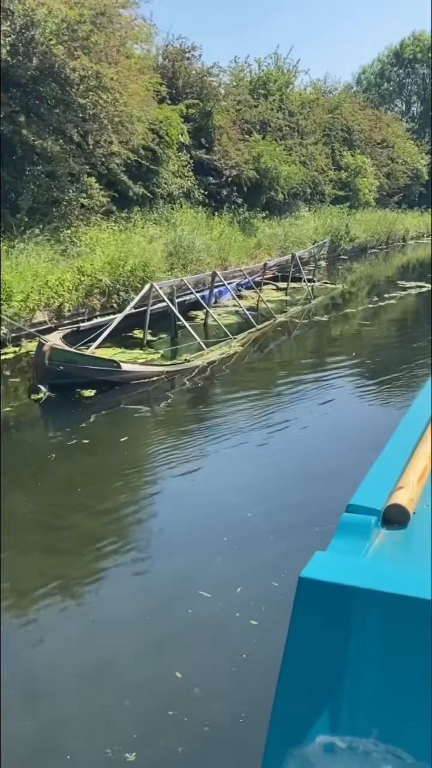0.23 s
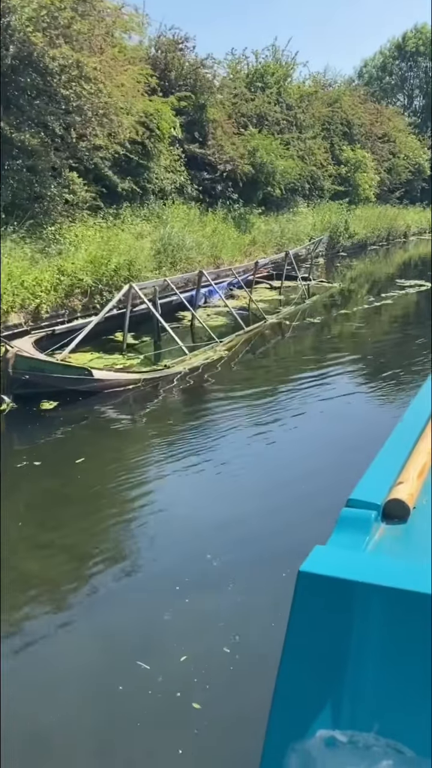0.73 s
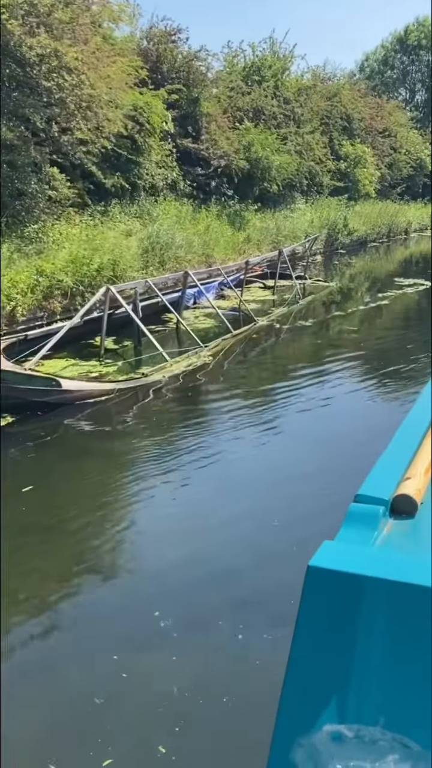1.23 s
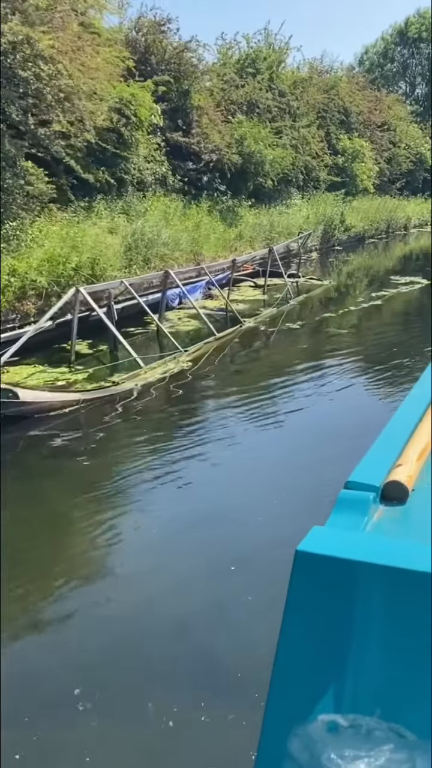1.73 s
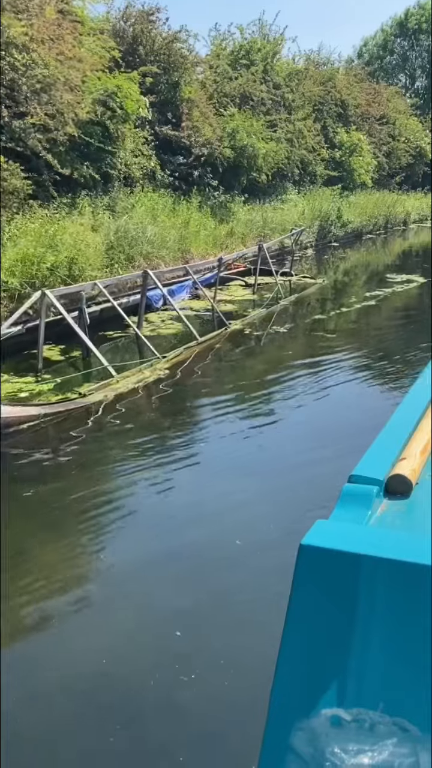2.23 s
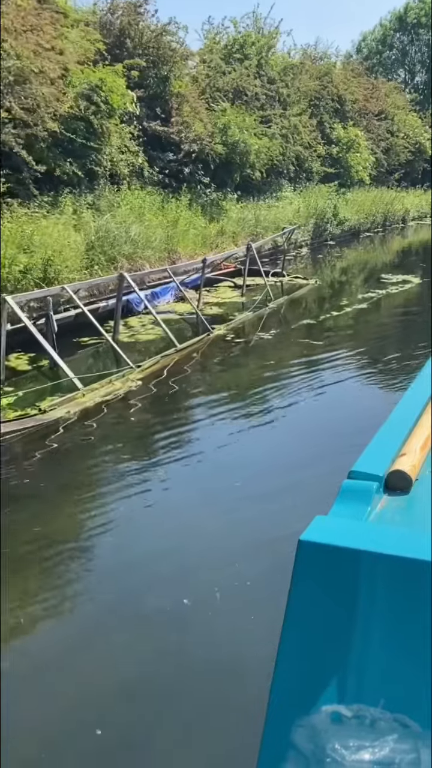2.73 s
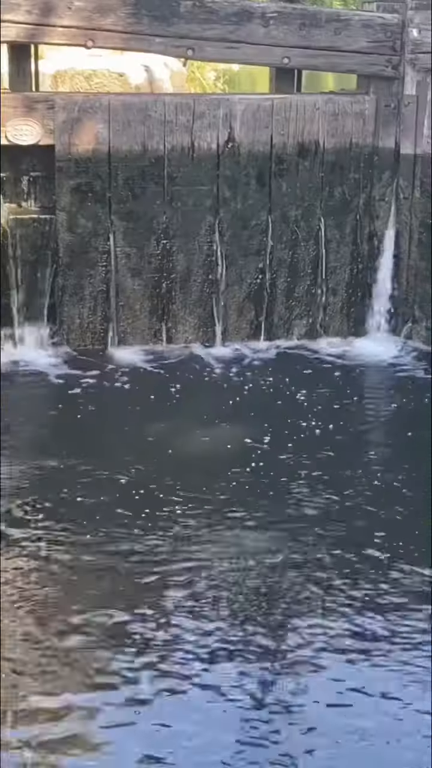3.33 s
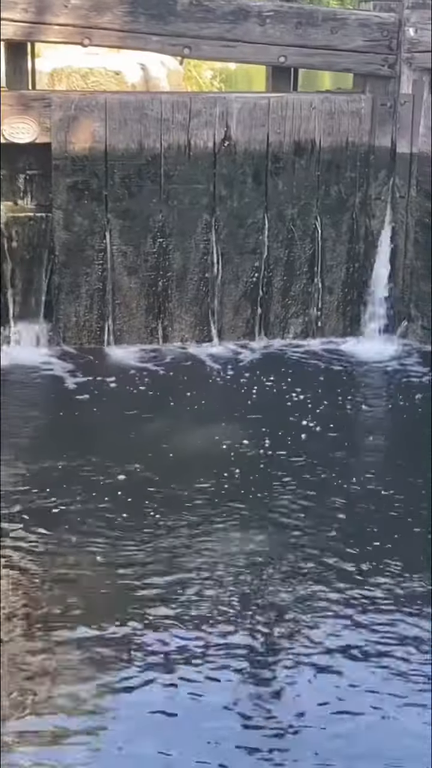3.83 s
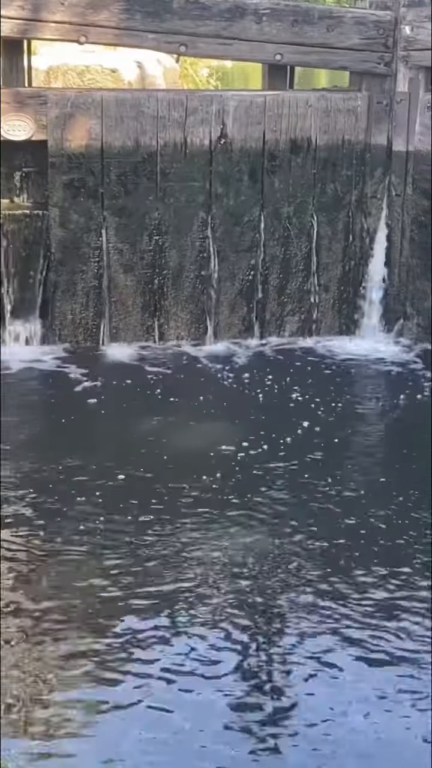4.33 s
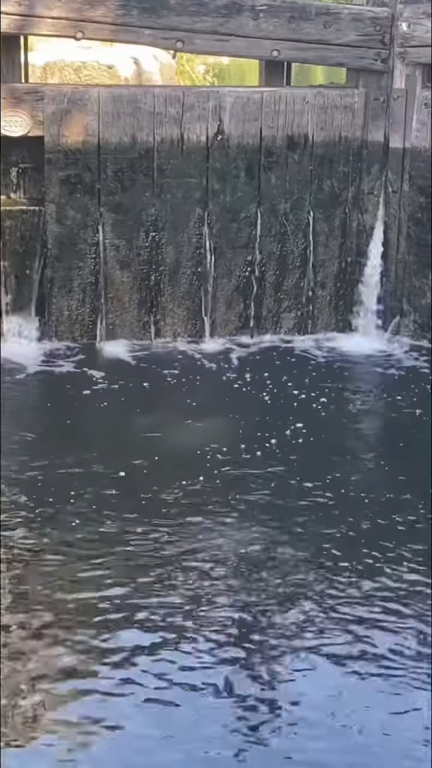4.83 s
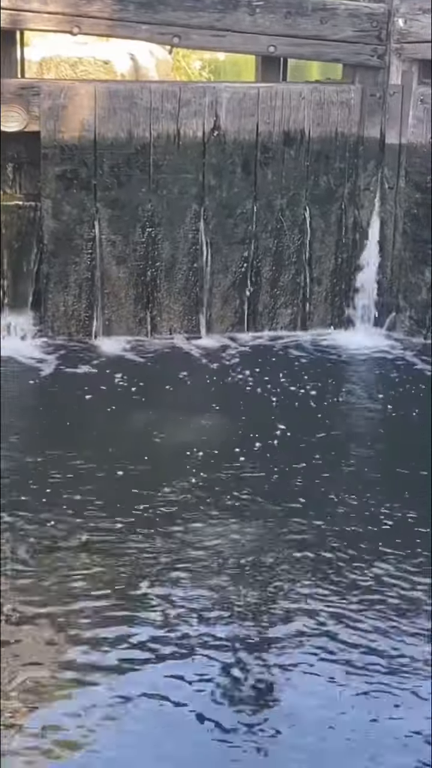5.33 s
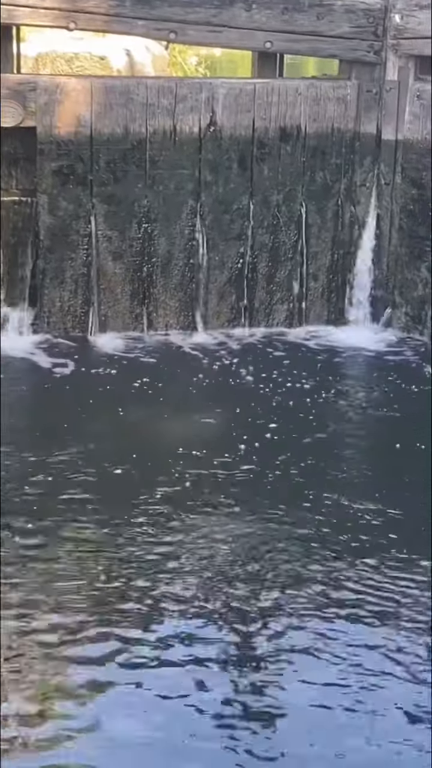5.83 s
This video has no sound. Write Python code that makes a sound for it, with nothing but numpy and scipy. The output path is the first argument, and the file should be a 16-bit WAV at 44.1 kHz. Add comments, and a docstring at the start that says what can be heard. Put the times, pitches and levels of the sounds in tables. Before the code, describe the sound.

Quiet canal glide with low water rumble, soft hull slops and a whistling hedge bird, then abruptly loud water pouring through lock gates over an idling engine.

```python
"""Water rumbles, slops and splashes on a boat gliding along a canal: shaped turbulence and ringing hull modes.
A small bird in the hedge repeats three down-slurred syllables, whistles on pitch curves; others twitter far off.
Then, abruptly, a lock: jets leak through the wooden gates and plunge into the pool as noise, drop ticks and
decaying bubble tones, while the boat's engine idles as a sum of orders of its firing rate.
Two closely spaced microphone ports hear it all, with partial coherence and phase differences."""
import sys
import numpy as np
from scipy import signal
from scipy.fft import rfft, irfft, next_fast_len
from scipy.io import wavfile
from scipy.ndimage import uniform_filter1d

SR = 44100
rng = np.random.default_rng(int(sys.argv[2]) if len(sys.argv) > 2 else 0)


def master_out(mix):
    """Clip the mix to full scale and print it as 16-bit PCM to the path in sys.argv[1]."""
    frames = np.transpose(np.atleast_2d(mix))
    ceiling = np.clip(frames, -1, 1)
    pcm = np.round(ceiling * 32767).astype(np.int16)
    wavfile.write(sys.argv[1], SR, pcm)


N = 267731

CHANGE_S = 2.999   # the canal ends and the lock begins
TIME = np.arange(N) / SR
SIZE = next_fast_len(N, real=True)
BINS = np.maximum(np.arange(SIZE // 2 + 1) * SR / SIZE, 1)   # Hz

# spectrum of the spray and patter of the jets: columns f/Hz, relative density/dB
SPRAY_SPECTRUM = [(1200, -40), (2800, 2.5), (4000, -2), (6300, 1), (10000, -6), (16000, -18)]


def from_db(db):
    """Logarithmic levels: decibels become an amplitude ratio."""
    return 10 ** (np.asarray(db) / 20)


def rms_one(x):
    """Mean-square normalisation: scale to unit rms."""
    return x / np.sqrt(np.mean(x ** 2) + 1e-20)


def at_hz(rows, hz):
    """Log-frequency interpolation: read each column of a table at the given frequencies."""
    points, *columns = np.transpose(rows)
    return [np.interp(np.log(hz), np.log(points), column) for column in columns]


def drift(rate):
    """Low-passed noise: a slow random fluctuation of unit rms with two poles at rate Hz."""
    step = 40   # samples between slow values
    pole = np.exp(-2 * np.pi * rate * step / SR)
    white = rng.standard_normal(N // step + 2002)
    slow = signal.lfilter([1], [1, -2 * pole, pole * pole], white)[2000:]   # skip the settling
    return np.interp(np.arange(N) / step, np.arange(len(slow)), rms_one(slow))


def add(track, s, sound):
    """Superposition: mix a short sound in at time s."""
    start = int(np.clip(s * SR, 0, N - 1))
    track[start:start + len(sound)] += sound[:N - start]


def colour(x, gain_db):
    """Linear filtering: weight the spectrum by a gain per frequency bin."""
    return irfft(rfft(x, SIZE) * from_db(gain_db), SIZE)[:N]


def noise(spectrum):
    """Stationary random noise: Gaussian samples of a given spectrum, at unit rms."""
    return rms_one(colour(rng.standard_normal(SIZE), at_hz(spectrum, BINS)[0]))


def turbulence(spectrum, patchy_db, rate):
    """Intermittency of turbulence: each half octave swells and sinks on its own, at unit rms in all."""
    coloured = rfft(noise(spectrum), SIZE)
    half_octave = np.floor(2 * np.log2(np.clip(BINS, 45, spectrum[-1][0])))
    total = np.zeros(N)
    for k in np.unique(half_octave):
        band = irfft(coloured * (half_octave == k), SIZE)[:N]
        total += band * from_db(patchy_db * drift(rate))
    return rms_one(total)


def scatter(x, t60):
    """Multiple scattering: many weak random reflections decay, with unit total energy."""
    t = TIME[:int(t60 * SR)]
    echoes = rng.standard_normal(len(t)) * from_db(-60 * t / t60)
    return signal.fftconvolve(x, echoes / np.linalg.norm(echoes))[:N]


def at_ports(direct, diffuse, ports):
    """Partial coherence: direct sound is common but out of phase, diffuse sound opposes at the two ports."""
    likeness, lead, balance_db = at_hz(ports, BINS)
    likeness = np.clip(likeness, 0, 1)
    sides = np.array([[1], [-1]])   # left, right
    common = np.sqrt((1 + likeness) / 2) * rfft(direct, SIZE)
    opposed = sides * np.sqrt((1 - likeness) / 2) * rfft(diffuse, SIZE)
    gain = from_db(sides * balance_db / 2)
    phase = np.exp(.5j * sides * lead)
    return irfft((common + opposed) * gain * phase, SIZE)[:, :N]


def waves():
    """Amplitude envelopes: each wave running along the hull swells, holds and ebbs."""
    # passing waves: columns start t/s, length/s, level/dB
    passing = [(0.0, 0.077, -43), (0.32, 0.26, -46), (0.884, 0.1, -46.5), (0.997, 0.24, -41),
               (1.3, 0.16, -46), (1.71, 0.12, -46)]
    attack_s, release_s = 0.027, 0.046
    swell = np.zeros(N)
    for s, length, db in passing:
        rise = np.clip((TIME - s) / attack_s, 0, 1)
        ebb = np.clip((s + length - TIME) / release_s + .5, 0, 1)
        swell += from_db(db) * rise * ebb
    return swell


def wash():
    """Flow noise: each wave lifts first the gurgle along the hull, then the rumble as it rolls under the boat."""
    # deep rumble under the boat: columns f/Hz, relative density/dB
    rumble_spectrum = [(15, -65), (30, -25), (50, -6), (68, -1.5), (92, -16), (130, -16), (300, -52),
                       (900, -74)]
    # gurgle along the side: columns f/Hz, relative density/dB
    wash_spectrum = [(50, -26), (110, -9), (145, -1), (200, 5), (240, -9.5), (285, -7), (380, -22),
                     (900, -57), (2500, -88)]
    rumble_db, rumble_db_per_s, wash_db = -51, 2, -50   # the rumble grows slowly, the wash is steady
    roll_lag_s, roll_db, roll_ref_db = 0.032, -41.5, -40
    roll_growth = 3.8   # exponent: bigger waves rumble disproportionately more
    swell = waves()
    late_swell = np.interp(TIME - roll_lag_s, TIME, swell)
    roll = from_db(roll_db) * (late_swell / from_db(roll_ref_db)) ** roll_growth
    rumble_level = np.hypot(from_db(rumble_db + rumble_db_per_s * TIME), roll)
    wash_level = np.hypot(from_db(wash_db), swell)
    rumble = rumble_level * turbulence(rumble_spectrum, patchy_db=-1.5, rate=16)
    return rumble + wash_level * turbulence(wash_spectrum, patchy_db=4.0, rate=8.8)


def canal_air():
    """Broadband ambient noise: the rush of the open air keeps a steady mean level."""
    # open air: columns f/Hz, relative density/dB
    air_spectrum = [(15, -25), (45, 5), (120, 0.5), (350, -2), (480, -3), (700, -1.5), (1000, -2),
                    (1400, -10.5), (2000, -21), (2600, -27), (3500, -30), (5200, -37.5), (6500, -44),
                    (8000, -56), (12000, -56), (16000, -71)]
    return from_db(-44.5) * turbulence(air_spectrum, patchy_db=0.85, rate=10.0)


def leaves(rustle_db=-74):
    """Fluctuating band noise: reeds and hedge rustle faintly, swelling here and there."""
    # reeds and leaves: columns f/Hz, relative density/dB
    rustle_spectrum = [(1200, -31), (2700, 5), (4500, 2.5), (6300, 0.5), (8000, -27.5), (13000, -23)]
    return from_db(rustle_db) * turbulence(rustle_spectrum, patchy_db=6.0, rate=7)


def hull(push_s=0.0055, upper_hz=100):
    """Modal excitation: wavelets push softly on the hull and set its low damped modes ringing."""
    # water slopping on the hull: columns t/s, level/dB, extra level of the upper modes/dB
    slops = [(0.017, -40, -5), (1.317, -33.5, -2), (1.77, -39.5, -6), (2.157, -38, -9), (2.213, -37.5, -6),
             (2.404, -42, -9), (2.635, -35, -11), (2.765, -36, -21)]
    # hull modes: columns mean f/Hz, relative level/dB, t60/s
    modes = [(60, 5.5, 0.14), (71, 0.5, 0.28), (140, 6.5, 0.21), (171, 4, 0.18), (214, -1, 0.19)]
    out, t = np.zeros(N), TIME[:SR // 2]
    for s, slop_db, upper_db in slops:
        for hz, mode_db, t60 in modes:
            swell = (1 - np.exp(-t / push_s)) ** 2 * from_db(-60 * t / t60)
            detuned_hz = hz * (1 + rng.normal(0, 0.087))
            ring = np.sin(2 * np.pi * detuned_hz * t)
            level_db = slop_db + mode_db + upper_db * (hz > upper_hz)
            add(out, s, from_db(level_db) * swell * ring)
    return out


def bird(notes, swoop_s, arch, fade_db):
    """Frequency modulation: each note glides to a held pitch, arches a little and flicks away at its end."""
    out = np.zeros(N)
    for s, start_hz, held_hz, end_hz, length, level_db in notes:
        t = TIME[:int(length * SR)]
        age = t / length
        swoop = (start_hz - held_hz) * np.exp(-(t / swoop_s) ** 1.4)
        flick = (end_hz - held_hz) * age ** 6
        hz = held_hz * (1 + arch * age ** 3 * (1 - age)) + swoop + flick
        edges = np.minimum(1, np.minimum(t, length - t) / .008)
        tone = np.sin(2 * np.pi * np.cumsum(hz) / SR)
        add(out, s, edges * from_db(level_db - fade_db * age) * tone)
    return out


def chorus(count=170, low_hz=2400, high_hz=5400, level_db=-75.5, bend=.25):
    """Random superposition: many far birds twitter in the trees, at pitches even on a log scale."""
    when, pitch, start, end, length = rng.random((count, 5)).T
    hz = low_hz * (high_hz / low_hz) ** pitch
    start_hz = hz * (1 + bend * (start - .5))
    end_hz = hz * (1 + bend * (end - .5))
    notes = [when * CHANGE_S, start_hz, hz, end_hz, .03 + .04 * length, np.full(count, level_db)]
    return bird(np.transpose(notes), swoop_s=.02, arch=.2, fade_db=3)


def far_birds():
    """Direct and scattered fields: hoarse song reaches both ports in step; of the chorus only the blur arrives."""
    # song further off: columns t/s, starting f/Hz, held f/Hz, ending f/Hz, length/s, relative level/dB
    warble = [(.615, 2490, 2580, 2900, 0.063, -64), (.645, 2150, 2270, 2450, 0.074, -65),
              (.675, 2750, 2900, 3100, .05, -67), (.825, 2670, 2650, 3120, 0.055, -63.5),
              (1.04, 2870, 2760, 2980, 0.049, -64.5), (1.205, 5000, 4450, 4200, 0.027, -72),
              (1.25, 2950, 2910, 3400, 0.076, -71), (1.3, 3200, 3600, 4200, 0.046, -70),
              (1.49, 2850, 3080, 3380, 0.06, -66), (2.085, 3020, 2950, 2900, .04, -67),
              (.775, 3930, 3450, 3100, .04, -71), (2.3, 3300, 3580, 4400, 0.046, -70),
              (2.295, 2300, 2285, 2230, 0.1, -64), (2.73, 2950, 2760, 2550, 0.05, -71)]
    hoarseness = .9 + .35 * drift(130)
    song = bird(warble, swoop_s=.02, arch=.2, fade_db=2) * hoarseness
    in_trees = song + chorus()
    ahead = from_db(-2.3) * song + from_db(-6.5) * scatter(in_trees, t60=.15)
    around = np.array([scatter(in_trees, t60=.3) for port in range(2)])
    return ahead + from_db(-3) * around


def splashes(grain_db=3):
    """Amplitude-modulated noise: ripples break against the bow in short, grainy bursts of droplets."""
    # breaking ripples: columns middle t/s, length/s, level/dB
    ripples = [(.225, 0.037, -64), (0.398, 0.054, -65), (0.477, .025, -68), (.555, .04, -70),
               (0.677, 0.055, -67), (1.18, 0.054, -68), (1.59, .04, -72), (1.95, 0.19, -67),
               (2.082, 0.18, -69.5), (2.34, .06, -70), (2.52, .05, -73), (2.835, .06, -70)]
    # their droplets: columns f/Hz, relative density/dB
    droplet_spectrum = [(800, -27), (2500, 8), (4500, 11), (6500, -12), (10000, -9), (13000, -27),
                        (16000, -36)]
    swell = sum(from_db(db) * np.exp(-(2 * (TIME - s) / length) ** 2) for s, length, db in ripples)
    return swell * rms_one(noise(droplet_spectrum) * from_db(grain_db * drift(150)))


def hedge_bird():
    """Interaural-style lag and level: a pure whistle follows its syllables; the trees throw it back diffusely."""
    # song: columns t/s, syllable, relative level/dB, fade over the note/dB
    song_notes = [(.306, "low", -60, 7), (.696, "low", -58.5, 4), (1.081, "mid", -56, 2),
                  (1.442, "high", -65.5, 0), (1.804, "mid", -58.5, 7), (2.162, "high", -64.5, 4),
                  (2.555, "low", -59.5, -4), (2.937, "low", -57.5, 2)]
    # syllables that swoop down, hold and fall away: columns t/s into the note, f/Hz, relative level/dB
    syllables = {"low": [(0, 6700, -13), (.013, 4500, -1), (.022, 4120, 0), (.045, 3880, -3),
                 (.07, 4110, -3), (.085, 3800, -5), (.104, 3300, -5)], "mid": [(0, 6900, -13),
                 (.014, 4800, 0), (.032, 4520, -1), (.067, 4760, -5), (.08, 4450, -5), (.093, 3850, -3),
                 (.105, 3550, -8)], "high": [(0, 6500, -10), (.011, 5500, 0), (.036, 5250, 0),
                 (.048, 4600, -6), (.06, 4050, -5), (.08, 3650, -7), (.095, 3400, -12)]}
    flutter_db = 1.2   # the whistle flickers on its way through the leaves
    lag_s, left_db, echo_db = .000135, 3.5, -10.5   # to one side: the left port hears it later but louder
    song = np.zeros(N)
    for s, name, note_db, fade_db in song_notes:
        when, pitch_hz, level_db = np.transpose(syllables[name])
        t = TIME[:int(when[-1] * SR)]
        hz = uniform_filter1d(np.interp(t, when, pitch_hz), size=400, mode="nearest")
        edges = np.minimum(1, np.minimum(t, when[-1] - t) / .006)
        level = from_db(note_db + np.interp(t, when, level_db) - fade_db * t / when[-1])
        add(song, s, edges * level * np.sin(2 * np.pi * np.cumsum(hz) / SR))
    song = song * from_db(flutter_db * drift(35))
    left = np.roll(song, round(lag_s * SR)) * from_db(left_db / 2)
    right = song * from_db(-left_db / 2)
    echoes = np.array([scatter(song, t60=.7) for port in range(2)])
    return np.array([left, right]) + from_db(echo_db) * echoes


def glugs(rows, rough):
    """Air-cavity resonance: each pocket swells and dies while its pitch glides; the water roughens it."""
    out = np.zeros(N)
    for s, start_hz, end_hz, length, level_db in rows:
        age = TIME[:int(length * SR)] / length
        hz = start_hz * (end_hz / start_hz) ** age
        swell = np.sqrt(np.sin(np.pi * age))
        add(out, s, from_db(level_db) * swell * np.sin(2 * np.pi * np.cumsum(hz) / SR))
    return out * (1 + rough * drift(23))


def canal():
    """Superposition of sources: the boat glides through open air past a hedge full of birds."""
    # hollows closing between wave and hull, falling in pitch:
    # columns t/s, starting f/Hz, ending f/Hz, length/s, level/dB
    hollows = [(.96, 329, 265, 0.1, -46), (.96, 207.4, 190, 0.16, -40), (1.37, 225, 159, .15, -39.5),
               (1.5, 278.7, 156.7, .31, -44)]
    # the two ports: columns f/Hz, likeness (0-1), left lead/rad, left minus right/dB
    canal_ports = [(70, .97, 0, 0), (130, .955, 0, 0), (250, .988, 0, -.2), (450, .94, .1, -.6),
                   (550, .87, .25, .7), (650, .84, 0, 3.3), (800, .8, 0, 4), (1000, .87, -.6, 4.3),
                   (1300, .89, -.73, 3.3), (1600, .89, -.6, 1.5), (1900, .8, -.35, .4),
                   (2200, .45, -.9, -.5), (2500, .55, -2.4, -.6), (4000, .65, -3.3, 1), (5600, .7, -4.7, 1),
                   (7400, .85, -3.1, 0), (10400, .8, 0, 0), (13400, .7, 3.1, 0)]
    direct = canal_air() + wash() + glugs(hollows, rough=0.41) + hull() + splashes() + leaves()
    diffuse = canal_air() + wash() + splashes() + leaves()
    return at_ports(direct, diffuse, canal_ports) + hedge_bird() + far_birds()


def engine(wander=0.0017, uneven_db=1.37):
    """Order synthesis: four cylinders fire unevenly, so the idle throbs in quarter orders; each order wavers."""
    # engine orders: columns multiple of the firing rate, mean level/dB rms
    firing_orders = [(1, -43.5), (1.25, -58), (1.75, -48.5), (2, -48), (2.25, -50), (2.5, -43.5),
                     (2.75, -47), (3, -40.5), (3.25, -48.5), (3.5, -55), (3.75, -46.5), (4, -39),
                     (4.25, -54), (5, -47), (7, -47.5), (10, -49.5)]
    # tones that beat against the firing, perhaps from belt-driven pumps: columns mean f/Hz, mean level/dB rms
    pump_tones = [(49.7, -56), (68.2, -50), (100.2, -51), (161.1, -51.5)]
    firing_hz = 31.43   # mean rate
    turns = np.cumsum(firing_hz * (1 + wander * drift(1.76))) / SR
    orders = list(firing_orders) + [(hz / firing_hz, db) for hz, db in pump_tones]
    out = np.zeros(N)
    for order, db in orders:
        amplitude = np.sqrt(2) * from_db(db + uneven_db * drift(5.0))
        out += amplitude * np.sin(2 * np.pi * (order * turns + rng.random()))
    return out


def drops(spectrum, per_s, spread_db):
    """Random impulse process: countless drops of uneven size tick on the water, at unit rms."""
    falls = rng.random(N) < per_s / SR
    ticks = falls * rng.choice([-1, 1], N) * from_db(spread_db * rng.random(N))
    return rms_one(colour(ticks, at_hz(spectrum, BINS)[0]))


def bubble(hz, t60, rise):
    """Bubble resonance: trapped air rings and dies, its pitch rising as it nears the surface."""
    t = TIME[:int(t60 * SR)]
    return np.sin(2 * np.pi * hz * t * (1 + rise * t / t60 / 2)) * from_db(-60 * t / t60)


def bubbles(count, low_hz, high_hz, cycles, rise, spread_db):
    """Random superposition of resonators: bubbles of all sizes are born at random, at unit rms in all."""
    # strength of a bubble by its pitch: columns f/Hz, relative level/dB
    bubble_spectrum = [(60, -43), (200, 0.5), (330, 7.5), (600, -3), (1100, 3), (2500, -5), (5000, -5)]
    out = np.zeros(N)
    for when, size, strength, life in rng.random((count, 4)):
        hz = low_hz * (high_hz / low_hz) ** size
        ring = bubble(hz, cycles * (.5 + life) / hz, rise)
        add(out, when * N / SR, ring * from_db(spread_db * strength) * np.sqrt(hz))
    return rms_one(colour(out, at_hz(bubble_spectrum, BINS)[0]))


def splats():
    """Impact noise: lumps of the jets slap the pool and throw up spray, each a short shower of drops."""
    # lumps of water: columns middle t/s, length/s, relative slap level/dB, relative spray level/dB
    lumps = [(3.068, 0.018, -46, -36.5), (3.352, 0.031, -46, -38), (3.418, .01, -39, -38),
             (3.52, 0.02, -37, -53), (3.58, .02, -40, -42), (3.683, .013, -33, -44), (3.703, .04, -38, -41),
             (3.949, .024, -37, -38.5), (4.043, .014, -35, -45), (4.075, 0.047, -46, -39),
             (4.19, 0.039, -42, -42), (4.3, .03, -37, -38), (4.446, .015, -47, -38),
             (4.513, 0.013, -38, -48), (4.605, 0.034, -32.5, -52), (4.644, .018, -39, -39.5),
             (4.704, .018, -35, -45), (4.743, 0.017, -48, -40), (4.824, 0.025, -34, -48),
             (4.882, 0.05, -35.5, -48), (4.99, .017, -41, -48), (5.163, 0.011, -39, -48),
             (5.254, 0.014, -52, -39), (5.307, 0.025, -35, -42.5), (5.363, .026, -48, -38),
             (5.439, 0.014, -30.5, -50), (5.533, 0.018, -36.5, -42), (5.664, 0.032, -33, -44),
             (5.691, 0.011, -30, -53), (5.772, 0.016, -36, -50), (5.91, .03, -34, -42),
             (6.029, 0.0097, -41, -43)]
    # slap: columns f/Hz, relative density/dB
    slap_spectrum = [(300, -28), (750, -1.5), (1150, 4), (2600, -8), (4500, -18)]
    slap, spray = np.zeros(N), np.zeros(N)
    for s, length, slap_db, spray_db in lumps:
        shape = np.exp(-np.minimum((2 * (TIME - s) / length) ** 2, 30))
        slap += from_db(slap_db) * shape
        spray += from_db(spray_db) * shape
    slaps = slap * drops(slap_spectrum, per_s=3600, spread_db=3)
    return slaps + spray * drops(SPRAY_SPECTRUM, per_s=6000, spread_db=10)


def chamber(x):
    """Room resonance: the gates and walls lift a few steady bands."""
    # resonances of the space before the gates: columns f/Hz, width/Hz, lift/dB
    resonances = [(733, 33, 2.5), (897, 71, 2.5), (1002, 45, 4), (1155, 60, 2), (1290, 56, 2),
                  (1620, 43, 2.5), (2520, 35, 3)]
    lift_db = sum(db * np.exp(-(2 * (BINS - hz) / width) ** 2) for hz, width, db in resonances)
    return colour(x, lift_db)


def lock():
    """Jet and bubble noise: the jets roar and patter, fill the pool with bubbles and gulp pockets of air."""
    # the leak surges a little: columns t/s, relative level/dB
    surge = [(3.05, 0.1), (3.2, 0.5), (3.33, -1), (3.52, 0.4), (3.72, 0.3), (3.95, 0), (4.15, -0.3),
             (4.45, 0), (4.61, -0.3), (4.72, 0), (5.1, 0), (5.55, -0.2), (6.05, 0)]
    # roar of the jets: columns f/Hz, relative density/dB
    pour_spectrum = [(18, -35), (35, -12), (60, -10), (100, -4), (150, -3), (350, -0.7), (600, -5.5),
                     (1000, -6), (1500, -6.5), (2000, -9.5), (2600, -9.5), (3700, -16.5), (6300, -17),
                     (16000, -25)]
    # roar thrown back by the lock walls: columns f/Hz, relative density/dB
    wall_spectrum = [(18, -30), (35, 4), (110, 3.5), (350, 0.5), (600, -5.5), (1000, -3.5), (2600, -8.5),
                     (3700, -15), (6300, -16), (16000, -24)]
    # big air pockets gulped under: columns t/s, starting f/Hz, ending f/Hz, length/s, relative level/dB
    gulps = [(3.19, 367, 390, 0.093, -33.5), (3.455, 335, 436, 0.067, -32.5), (3.497, 227, 212, 0.044, -28),
             (3.515, 1030, 1110, 0.039, -31.5), (3.745, 283, 320, 0.046, -25.5),
             (3.785, 304, 343, 0.038, -30), (3.85, 345, 365, 0.025, -32), (3.915, 423, 340, 0.059, -32),
             (3.925, 1027, 1053, 0.047, -32), (4.02, 507, 550, 0.028, -31), (4.03, 866, 894, 0.035, -33),
             (4.15, 380, 400, 0.034, -32), (4.28, 215, 231, 0.049, -28.5), (4.305, 332, 357, 0.021, -29.5),
             (4.428, 300, 324, .035, -29.5), (4.485, 365, 390, 0.019, -27), (4.568, 420, 515, 0.027, -24.5),
             (4.595, 327, 347, 0.041, -38), (4.835, 289.5, 333, 0.088, -29.5),
             (4.915, 292, 307, 0.059, -34), (4.955, 342, 368, 0.047, -30), (4.97, 880, 910, 0.042, -33),
             (5.04, 325, 357, 0.034, -27), (5.08, 352, 500, 0.044, -29), (5.228, 390, 410, 0.017, -28),
             (5.492, 744, 754, 0.038, -33), (5.65, 186, 204, 0.031, -29), (5.745, 753, 775, .035, -35),
             (5.797, 746, 750, 0.038, -34), (5.872, 315, 338, 0.045, -33), (5.935, 370, 394, 0.029, -29.5)]
    # the two ports: columns f/Hz, likeness (0-1), left lead/rad, left minus right/dB
    lock_ports = [(240, 1, 0, 0), (330, .992, 0, -.3), (400, .982, 0, -.3), (550, .95, .1, .9),
                  (800, .978, 0, 3.3), (1000, .99, 0, 3.7), (1400, .986, 0, 3.9), (1750, .982, 0, 0),
                  (2150, .965, .08, 0), (2480, .86, .62, 0), (2750, .88, .3, 0), (2950, .97, .1, 0),
                  (3400, .995, 0, 0), (4050, .93, .1, 0), (4400, .74, .72, 0), (5000, .95, .08, 0),
                  (5300, .82, .35, 0), (5600, .75, .87, 0), (6200, .71, 2, 0), (6750, .8, 2.8, 0),
                  (7350, .97, 3.14, 0), (8000, .8, 3.6, 0), (8600, .68, 4.35, 0), (9400, .68, 5.3, 0),
                  (10400, .95, 6.28, 0), (11800, .64, 7.5, 0), (12700, .7, 8.8, 0), (13600, .97, 9.42, 0),
                  (14800, .55, 10.6, 0), (16000, .5, 12.6, 0)]
    pour_db = -34.5
    flow = from_db(pour_db + np.interp(TIME, *np.transpose(surge)))
    roar = from_db(2.0) * turbulence(pour_spectrum, patchy_db=0.65, rate=18.0)
    patter = from_db(-12.0) * drops(SPRAY_SPECTRUM, per_s=900, spread_db=12)
    # small bubbles, then large ones
    fizz = bubbles(count=5000, low_hz=641, high_hz=5440, cycles=13.7, rise=0.032, spread_db=18.0)
    churn = bubbles(count=700, low_hz=196.6, high_hz=550, cycles=25.4, rise=0.47, spread_db=26.0)
    jets = flow * (roar + patter + from_db(-6.0) * fizz + from_db(-6.5) * churn)
    water = jets + from_db(-0.5) * splats()
    direct = chamber(water) + from_db(-4.0) * glugs(gulps, rough=0.22) + engine()
    off_walls = flow * from_db(1.5) * noise(wall_spectrum)
    return at_ports(direct, off_walls, lock_ports)


def scene():
    """Amplitude gating: the canal fades out quickly and the lock takes its place."""
    canal_fade_s, lock_fade_s = .02, .033
    leaving = np.clip((CHANGE_S - TIME) / canal_fade_s, 0, 1)
    arriving = np.clip((TIME - CHANGE_S) / lock_fade_s, 0, 1) ** 2
    return np.sqrt(leaving) * canal() + arriving * lock()


def record(dry):
    """Elliptic low-pass filtering: the top is cut steeply."""
    cutoff_hz = 15750
    return signal.sosfilt(signal.ellip(12, .1, 90, cutoff_hz, fs=SR, output="sos"), dry)


dry = scene()
out = record(dry)
master_out(out)
```